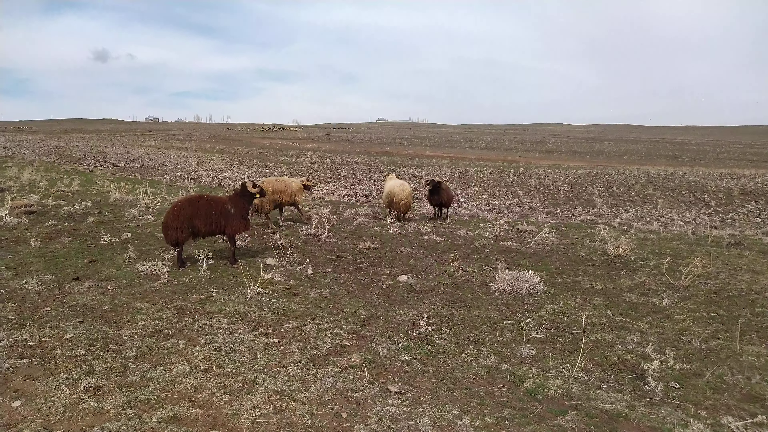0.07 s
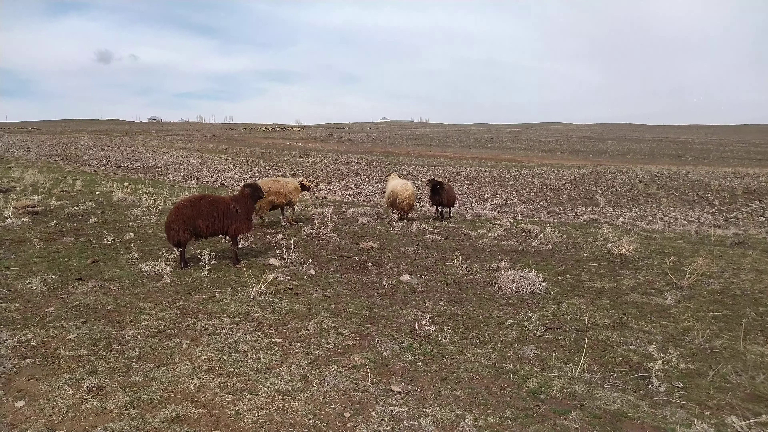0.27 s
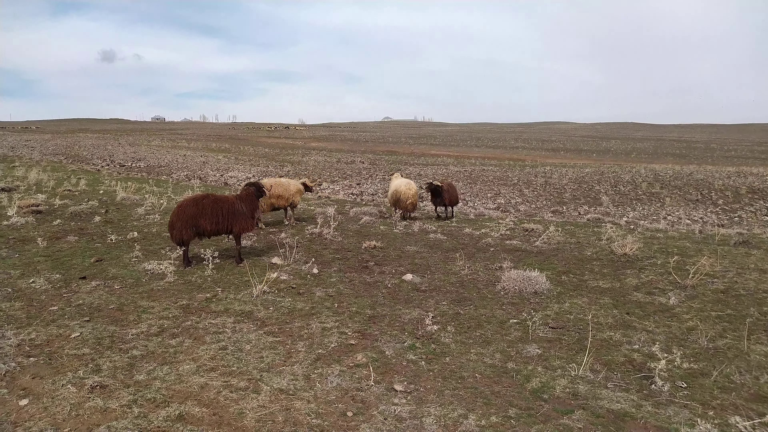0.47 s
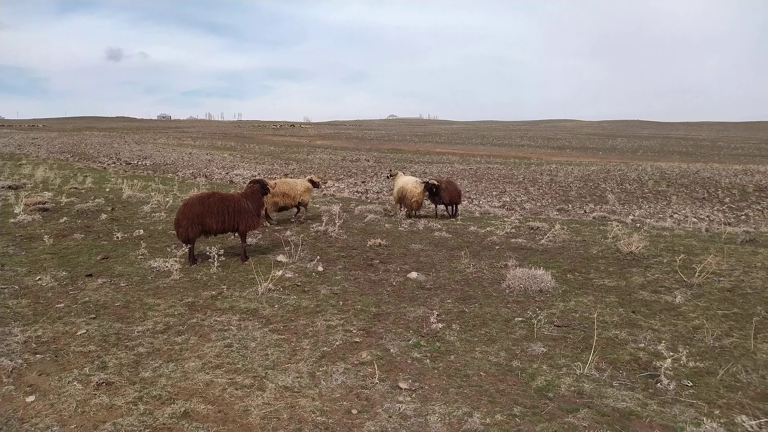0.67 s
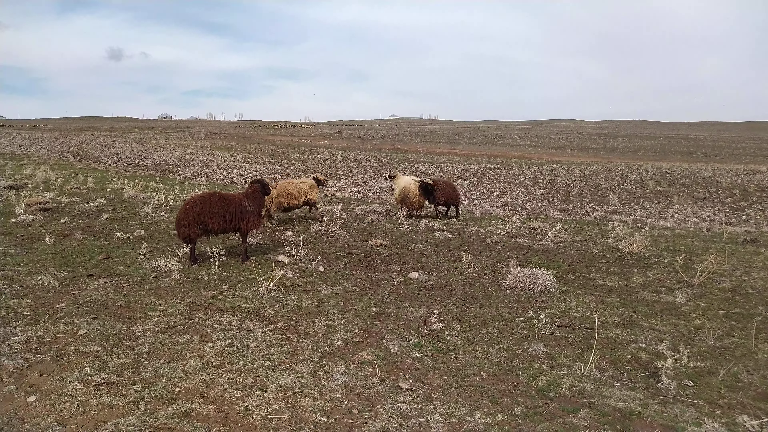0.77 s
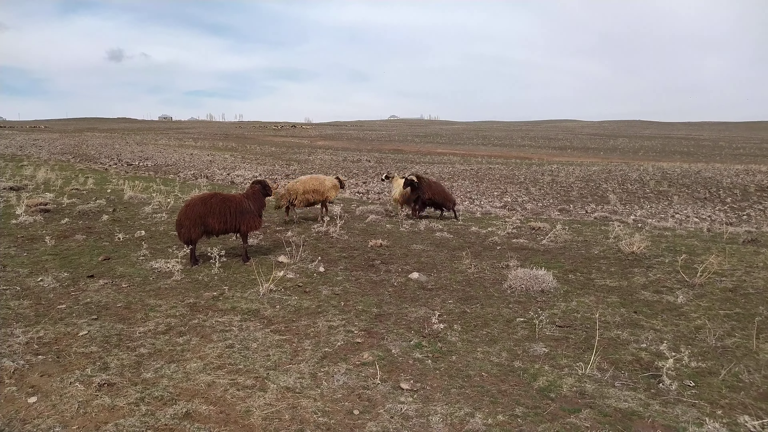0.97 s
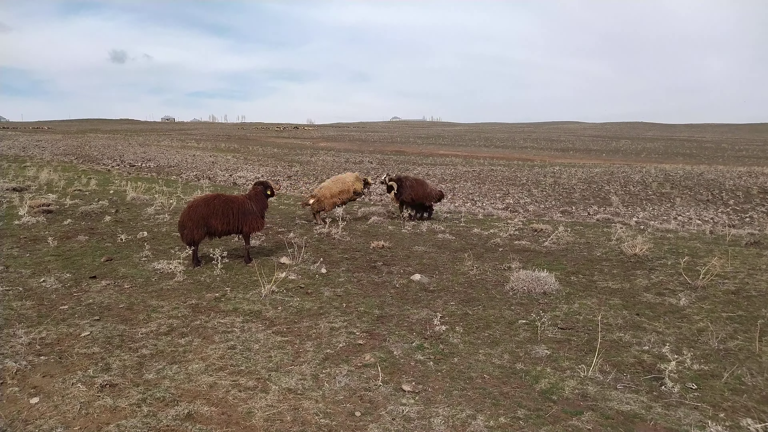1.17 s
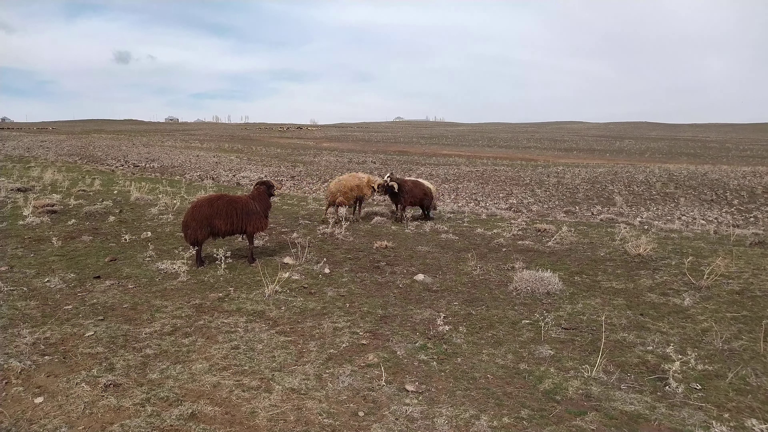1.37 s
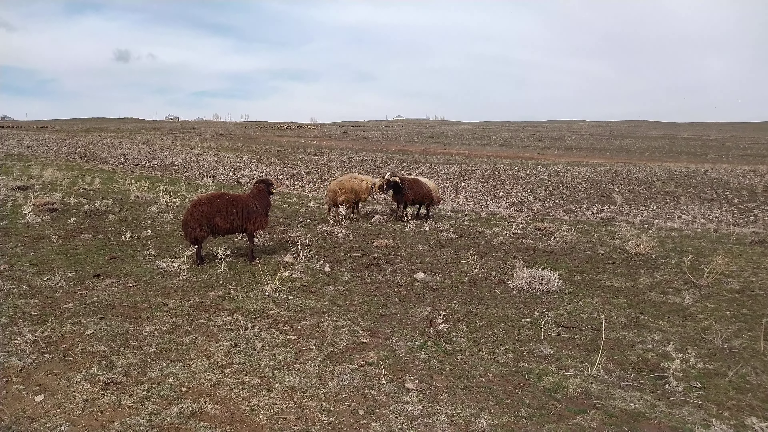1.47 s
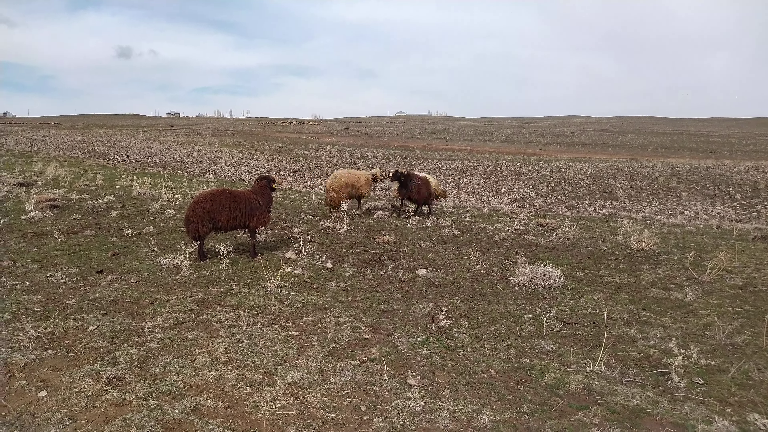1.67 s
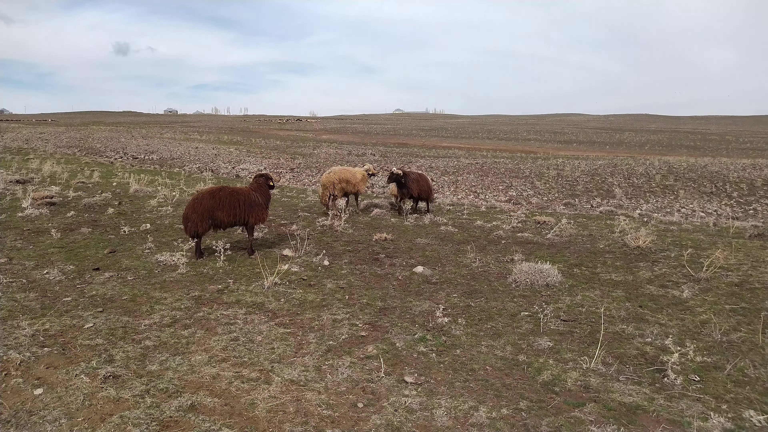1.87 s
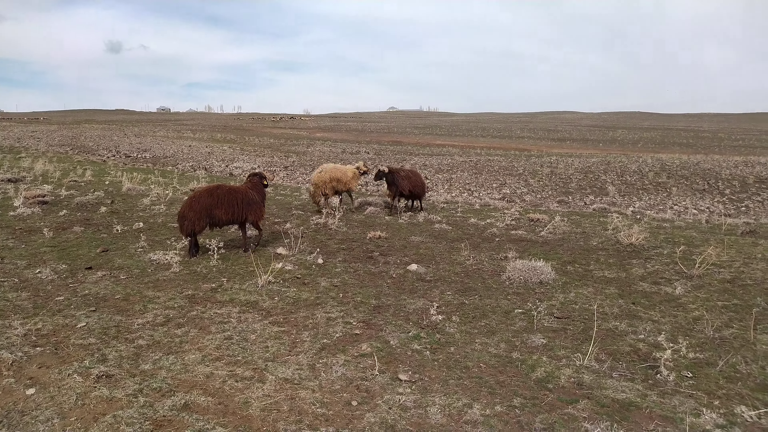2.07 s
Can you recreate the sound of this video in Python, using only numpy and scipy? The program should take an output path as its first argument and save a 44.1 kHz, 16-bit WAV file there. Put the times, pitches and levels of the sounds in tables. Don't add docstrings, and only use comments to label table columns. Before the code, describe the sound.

Two rams' horns clash with one hard, dry crack and a smaller knock on windy open pasture

```python
import sys
import numpy as np
from scipy import signal
from scipy.io import wavfile
from scipy.ndimage import uniform_filter1d

SR = 44100
rng = np.random.default_rng(int(sys.argv[2]) if len(sys.argv) > 2 else 0)


def wav_out(sig):
    wavfile.write(sys.argv[1], SR, np.round(np.clip(np.atleast_2d(sig).T, -1, 1) * 32767).astype(np.int16))


def rack_gain(trim_db):
    fader = np.asarray(trim_db, float)
    return 10 ** (fader / 20)


N = 93095


def evened(x):
    return x / np.sqrt(np.mean(x ** 2) + 1e-20)


def read(points, hz):
    point_hz, value = np.transpose(points)
    return np.interp(np.log(hz + 1), np.log(point_hz + 1), value)


def curve(rows):
    row_s, value = np.transpose(rows)
    return np.interp(np.arange(N) / SR, row_s, value)


def add(mix, start_s, sound):
    part = mix[:, round(start_s * SR):][:, :sound.shape[1]]
    part += sound[:, :part.shape[1]]


def sides(pan_db):
    return rack_gain(np.array([[0.5], [-0.5]]) * pan_db)


def resonate(x, hz, width_hz):
    b, a = signal.iirpeak(min(hz, SR / 2.2), hz / width_hz, SR)
    return signal.lfilter(b, a, x)


def noise(spectrum, same, patch_db, size):
    frames, hz = 4 * N // size + 5, np.fft.rfftfreq(size, 1 / SR)
    a, b, c, d, patches = rng.standard_normal((frames, len(hz), 5)).T
    patches = uniform_filter1d(patches, size=8, axis=0)
    patches = evened(uniform_filter1d(patches, size=8, axis=1))
    likeness = np.clip(read(same, hz), -1, 1)[:, None]
    left, other = a + 1j * b, c + 1j * d
    right = likeness * left + np.sqrt(1 - likeness ** 2) * other
    z = np.array([left, right]) * rack_gain(read(spectrum, hz)[:, None] + patch_db * patches)
    return evened(signal.istft(z, nperseg=size, noverlap=3 * size // 4)[1][:, :N])


def ring(modes, share=1, detune=0, centre_hz=None, reach_db=-23):
    out = 0
    shifts = rng.uniform(-1, 1, len(modes))
    for (hz, level_db, t60_s, rise_ms, pan_db), shift in zip(modes, shifts):
        left_lag_s = 0.000124 * (hz > 3000)
        t = np.maximum(np.arange(SR // 5) / SR - np.array([[left_lag_s], [0]]), 0)
        swell = (1 - np.exp(-1000 * t / (rise_ms * share))) ** 2
        octaves = np.log2(hz / (centre_hz or hz))
        gain = rack_gain(level_db + reach_db * octaves ** 2 - 60 * t / (t60_s * share))
        tone = np.sin(2 * np.pi * hz * (1 + detune * shift) * t)
        out = out + sides(pan_db) * gain * swell * tone
    return out


def snap(t60_s, hz, width_hz, broad):
    t = np.arange(SR // 25) / SR
    both, left, right = rng.standard_normal((3, len(t)))
    shared = 0.41
    burst = shared * both + (1 - shared) * np.array([left, right])
    burst = burst * rack_gain(-60 * t / t60_s) * np.minimum(t / 0.00032, 1)
    peak = resonate(resonate(burst, hz, width_hz), hz, 2 * width_hz)
    out = peak + broad * resonate(burst, 6000, 6730)
    return out / abs(out).max()


# [hz, correlation]
PORT_LIKENESS = [(60, 0.72), (240, 0.61), (950, -0.046), (3770, -0.14), (15000, -0.91)]
# [time_s, level_db]
WIND_LEVEL = [(0, -67.5), (.3, -67), (.7, -65), (1.0, -62.5), (1.09, -64), (1.2, -59.5), (1.4, -60.5),
              (1.6, -62), (2.11, -66.5)]
# [time_s, left_minus_right_db]
WIND_LEAN = [(0, -4), (.4, -4.5), (.6, -0.3), (1.6, .5), (2.11, -4)]
# [hz, density_db_per_hz]
WIND_SPECTRUM = [(2.9, -33.5), (5.0, 0), (16, 2), (38, -12), (155, -14), (609, -29), (900, -33),
                 (1170, -69), (1980, -120)]


def wind():
    gusts = noise(WIND_SPECTRUM + [(2000, -74.5)], PORT_LIKENESS, 3.5, size=2048)
    return rack_gain(curve(WIND_LEVEL)) * sides(curve(WIND_LEAN)) * gusts


# [hz, density_db_per_hz]
AIR_SPECTRUM = [(88, -33.5), (150, 0), (414, -11.0), (3350, -13.5), (7180, -19.5), (8900, -19.5),
                (11500, -38), (14200, -30.5), (16000, -44)][:-3] + [(11500, -18.5), (15500, -11)]


def air():
    return rack_gain(-65.5) * noise([(60, -35.0)] + AIR_SPECTRUM, PORT_LIKENESS, 2.6, size=1024)


# [start_s, length_s, from_hz, to_hz, level_db]
LARK_NOTES = [
    (0.375, 0.028, 4050, 3800, -83),
    (0.403, 0.027, 3630, 3580, -82.5),
    (0.473, 0.069, 4080, 3930, -83),
    (0.61, 0.017, 4350, 4200, -79),
    (.712, 0.03, 4050, 3540, -81),
    (.835, 0.089, 3220, 3266, -82),
    (1.144, 0.028, 3840, 4300, -79.5),
    (1.365, 0.014, 4000, 3800, -71),
    (2.035, 0.048, 4480, 3290, -73),
]


def lark():
    out = np.zeros((2, N))
    for start_s, length_s, from_hz, to_hz, level_db in LARK_NOTES:
        u = np.arange(0, 1, 1 / (length_s * SR))
        drift = evened(uniform_filter1d(rng.standard_normal(4410), size=200))
        waver = 1.3 + 0.48 * drift[:len(u)]
        tone = np.sin(2 * np.pi * np.cumsum(from_hz + (to_hz - from_hz) * u) / SR)
        add(out, start_s, rack_gain(level_db + 3.5) * sides(6) * tone * waver * np.sin(np.pi * u) ** 0.54)
    return out


# [start_s, level_db, pitch_hz]
STEMS = [(.0054, -41, 8800), (.0084, -36.5, 9200), (0.017, -39, 9000), (.1366, -50, 8800),
         (.0762, -65, 9300), (0.2237, -64, 7560), (.3431, -53.5, 8800), (0.3676, -53, 6800),
         (0.397, -52, 7300), (0.406, -51.5, 8250), (0.5512, -52, 9140), (.6379, -51, 8300),
         (0.692, -59, 8560), (0.722, -56, 8600), (0.7596, -59, 8550), (0.979, -53, 8700),
         (0.824, -54.5, 7100), (1.35, -38, 7800), (1.359, -40, 8800), (1.4054, -26.5, 8130),
         (1.4135, -35, 8100), (1.4293, -40, 8400), (1.4355, -45, 8100), (1.4511, -39.5, 6200),
         (1.456, -48, 7400), (1.7004, -42, 7540), (1.712, -39, 6440), (1.725, -49, 7400),
         (1.732, -51, 7600), (1.745, -41.5, 6300), (1.7531, -41, 7900), (1.9643, -38.5, 8270),
         (1.98, -46, 8400), (1.985, -54, 9100), (1.9934, -58, 9500), (2.0151, -61, 9200)]
# [time_s, level_db]
RUSTLE_LEVEL = [(0, -62), (.04, -68), (.15, -70), (.28, -73.5), (.41, -69.5), (.9, -71), (1.18, -67.5),
                (1.25, -56.5), (1.3, -57), (1.44, -56.5), (1.47, -59), (1.6, -64.5), (1.69, -62.5),
                (1.75, -59.5), (1.9, -68.5), (1.96, -65), (2.0, -57.5), (2.11, -70.5)]
RUSTLE_PER_S, RUSTLE_SPREAD_DB = 3000, 2.8


def grass():
    out = np.zeros((2, N))
    for (start_s, level_db, pitch_hz), lean in zip(STEMS, rng.uniform(-1, 2, len(STEMS))):
        stem = snap(0.0089, pitch_hz, width_hz=2050, broad=0.17)
        add(out, start_s, rack_gain(level_db + 1.1) * sides(lean * 4.5) * stem)
    hit = rng.random((2, N)) < RUSTLE_PER_S / SR
    force = np.minimum(rng.exponential(1, (2, N)), 3.2)
    clicks = hit * rack_gain(RUSTLE_SPREAD_DB * force) * rng.standard_normal((2, N))
    peak = resonate(resonate(clicks, 8800, 900), 8800, 5300)
    broad = resonate(resonate(clicks, 7500, 5900), 7700, 6000)
    return out + rack_gain(curve(RUSTLE_LEVEL)) * evened(peak + 0.67 * broad)


# [start_s, length_s, level_db, pitch_hz]
SCUFFS = [
    (0, 0.13, -73.5, 1230),
    (1.056, .05, -64, 230),
    (1.19, 0.069, -63.5, 1950),
    (1.297, 0.05, -53.5, 1900),
    (1.32, 0.028, -42.5, 199),
    (1.495, 0.083, -67.5, 2020),
    (1.757, 0.052, -67, 2290),
    (1.96, 0.18, -72.5, 1320),
    (1.93, 0.23, -74.5, 450),
    (1.4, .04, -66, 630),
]
SCUFF_Q, SCUFF_GRAINS_PER_S = 1.9, 1300


def scuffs():
    out = np.zeros((2, N))
    for start_s, length_s, level_db, pitch_hz in SCUFFS:
        u = np.arange(0, 1, 1 / (length_s * SR))
        a, b, pick = rng.standard_normal((3, SR // 4))[:, :len(u)]
        grit = 0.3 + 1.5 * (abs(pick) < SCUFF_GRAINS_PER_S / SR)
        grains = np.array([a, a + b * pitch_hz / 3000]) * grit
        width_hz = pitch_hz / SCUFF_Q
        brush = resonate(resonate(grains, pitch_hz, width_hz), pitch_hz, 1.1 * width_hz)
        add(out, start_s, rack_gain(level_db) * evened(brush) * np.sin(np.pi * u ** 0.6))
    return out


# [hz, level_db, t60_s, rise_ms, left_minus_right_db]
TIP_MODES = [(180, -15, .14, 5, -1), (251, -12, 0.05, 2.5, -1), (371, -8, .04, 2, 0.5),
             (856, -8, .03, 0.9, -3), (1220, -10, 0.025, .9, -0.5), (1670, -3, 0.017, 0.9, 8.5),
             (1870, -4, .017, .9, 9), (2100, -5, 0.015, 0.8, 12)]
# [start_s, peak_db, centre_hz, ring_share]
KNOCKS = [(.115, -62, 290, 1.37), (.59, -51.5, 2100, 0.33), (1.076, -56.5, 297, 1.74),
          (1.087, -53.5, 1920, 0.8), (1.245, -40.5, 2030, 0.5), (1.3259, -39, 234, 0.68),
          (1.3313, -28.5, 1950, 0.49), (1.336, -40, 2100, 0.47), (1.391, -42.5, 1290, 0.59),
          (1.393, -43, 600, 0.48), (1.408, -46, 2200, 0.48), (1.4222, -42, 1800, 0.69),
          (1.452, -25, 1730, 0.61), (1.454, -34.5, 454, 0.59), (1.4563, -34, 1750, 0.59),
          (1.457, -36, 840, 0.71), (1.46, -51, 179, 0.98), (1.724, -49, 725, 0.2), (1.832, -55, 2102, 0.63)]


def knocks():
    out = np.zeros((2, N))
    for start_s, peak_db, centre_hz, share in KNOCKS:
        blow = ring(TIP_MODES, share, detune=0.02, centre_hz=centre_hz, reach_db=-9)
        add(out, start_s, rack_gain(peak_db) * blow / abs(blow).max())
    return out


# [hz, density_db_per_hz]
SCATTER_SPECTRUM = [(24, -32.5), (40, 3.5), (527, -14), (980, -10), (1260, -20), (2280, -14.5),
                    (3300, -28.5), (8690, -26), (15000, -54)]
# [hz, t60_s]
SCATTER_T60 = [(60, 0.37), (250, 0.84), (700, 0.44), (2500, 0.3), (10000, 0.27)]


def scatter():
    likeness = [(600, 0.99), (1500, 0.37), (5000, 0.3)]
    hz, t, z = signal.stft(noise(SCATTER_SPECTRUM, likeness, 2.5, size=256), SR, nperseg=256)
    flicker_db = 1.5 * evened(uniform_filter1d(rng.standard_normal(len(t)), size=3))
    decay_db = -60 * t / read(SCATTER_T60, hz)[:, None]
    tail = signal.istft(z * rack_gain(flicker_db + decay_db), SR, nperseg=256)[1]
    rise = np.minimum(np.arange(tail.shape[1]) / SR / 0.018, 1)
    return rack_gain(-39.5) * tail * rise


CLASH_S = 1.2634
# [hz, level_db, t60_s, rise_ms, left_minus_right_db]
HORN_MODES = [(65, -23.5, 0.11, 10, -0.5), (319, -24.5, 0.12, 3, 1), (220, -22.5, 0.058, 2.4, -0.5),
              (461, -15, 0.024, 0.86, 1.5), (3567, -18.5, 0.0073, .2, 6.5), (725, -24, 0.019, 0.59, -0.5),
              (886.5, -21, 0.013, .8, -1), (1011, -26, 0.019, 1.7, 2.5), (1824, -9.5, 0.011, 0.95, 7.5),
              (2083, -9, 0.0082, 0.62, 20), (4370, -16, 0.0061, 0.071, 8.5), (5400, -7.5, 0.0026, 0.18, 12),
              (8800, -19.5, 0.0051, 0.29, -7), (8420, -2, 0.0045, 0.13, 0.5)]
# [delay_ms, level_db, centre_hz, left_minus_right_db]
CONTACTS = [
    (1.88, -1.5, 8600, -14),
    (2.78, -1, 2000, 0),
    (3.1, 11, 930, 0),
    (4.55, 3, 250, 0),
    (13, 1, 800, 0),
    (10.5, -17, 2100, 0),
    (7, -24, 8700, -8),
    (24, -27, 8600, 0),
    (28, -7, 950, 0),
]


def clash():
    out = np.zeros((2, N))
    add(out, CLASH_S, ring(HORN_MODES))
    add(out, CLASH_S, rack_gain(-16) * sides(2.5) * snap(0.025, 8350, width_hz=730, broad=1.0))
    for delay_ms, level_db, centre_hz, pan_db in CONTACTS:
        gains = rack_gain(level_db) * np.array([[rack_gain(pan_db)], [1]])
        add(out, CLASH_S + delay_ms / 1000, gains * ring(HORN_MODES, centre_hz=centre_hz))
    add(out, CLASH_S, scatter())
    return out


def scene():
    return wind() + air() + lark() + grass() + scuffs() + knocks() + clash()


def band_limit(x):
    return signal.sosfilt(signal.butter(12, 16500, fs=SR, output="sos"), x)


def record(dry):
    mic_hz, edge_hz, drop_db = 10300, 15900, -6
    shelf_hz = [0, mic_hz - 600, mic_hz + 900, edge_hz - 700, edge_hz, SR / 2]
    shelf = signal.firwin2(257, shelf_hz, [1, 1, rack_gain(drop_db), rack_gain(drop_db - 3), 0, 0], fs=SR)
    return band_limit(signal.oaconvolve(dry, shelf[None], "same"))


dry = scene()
out = record(dry)
wav_out(out)
```